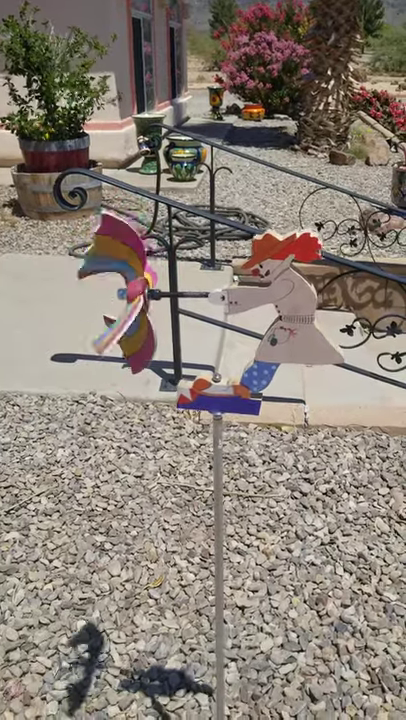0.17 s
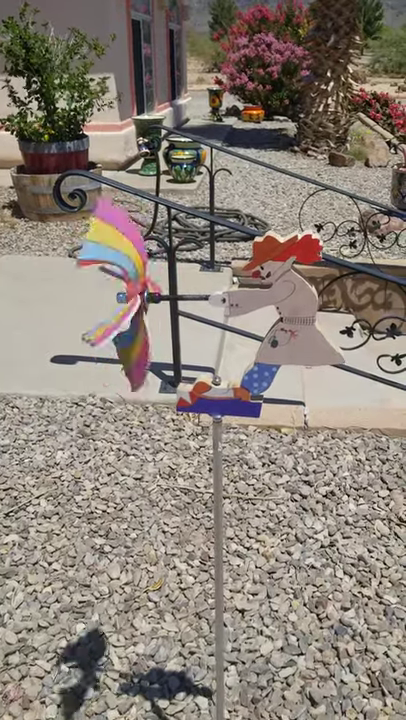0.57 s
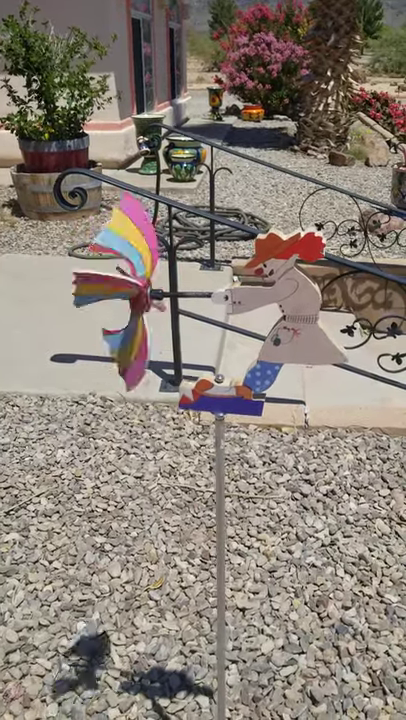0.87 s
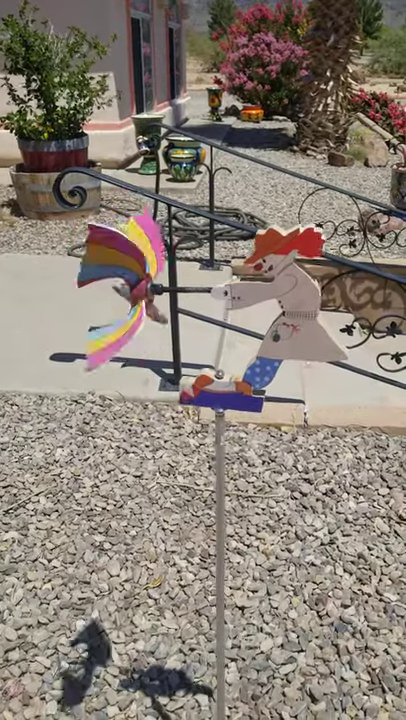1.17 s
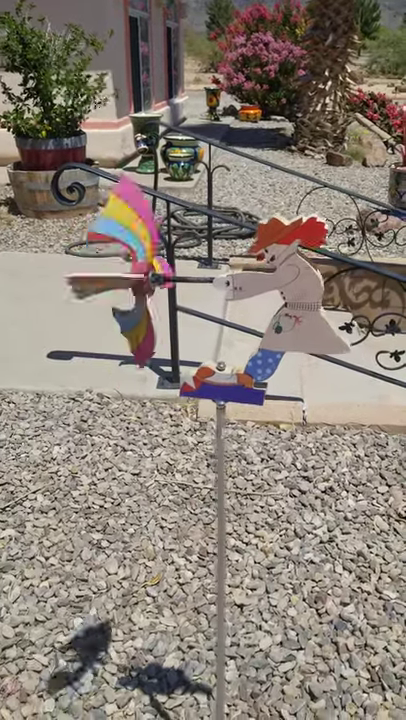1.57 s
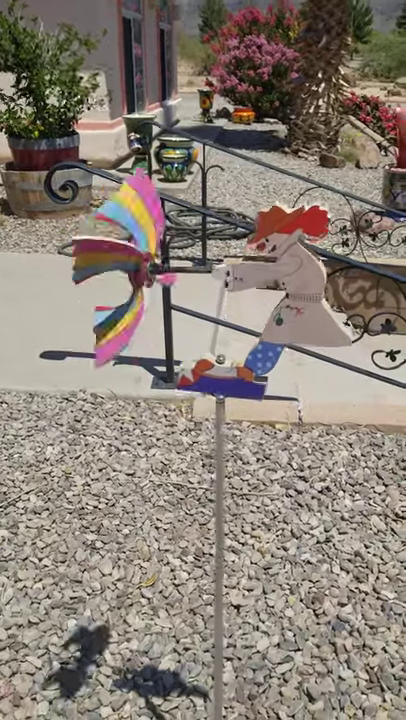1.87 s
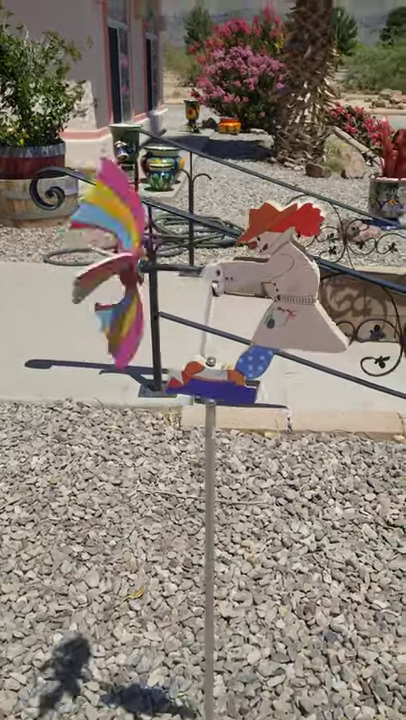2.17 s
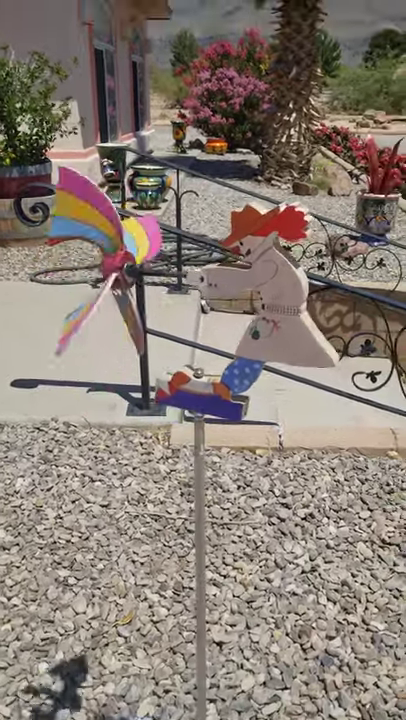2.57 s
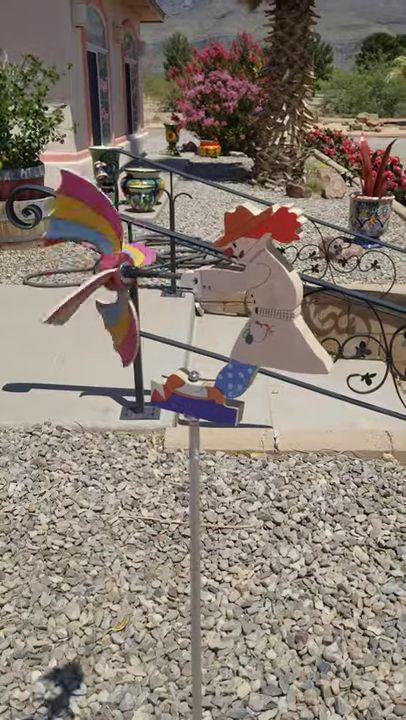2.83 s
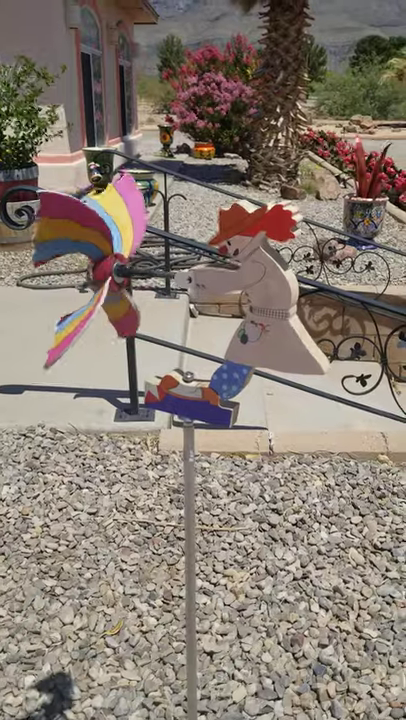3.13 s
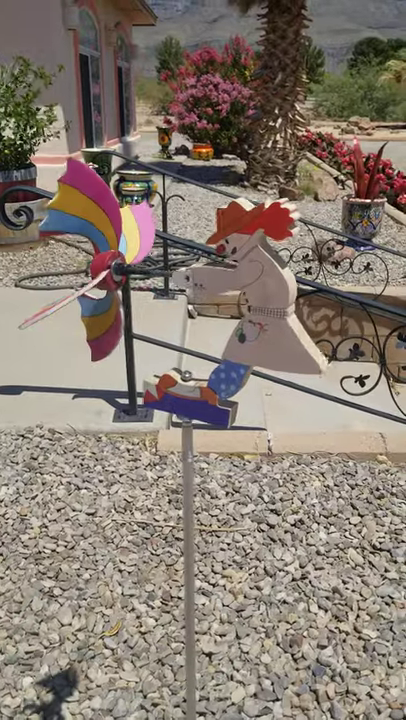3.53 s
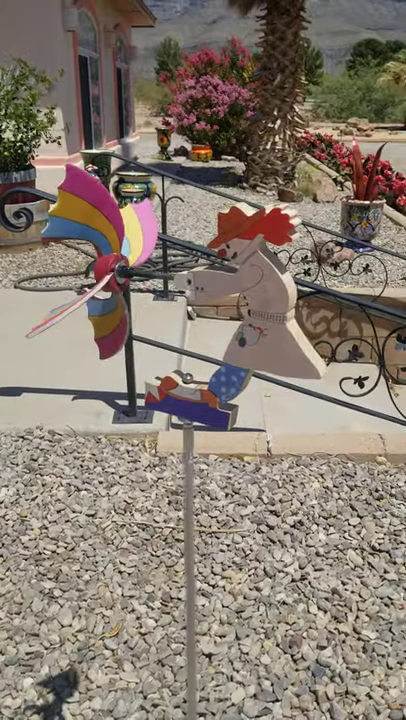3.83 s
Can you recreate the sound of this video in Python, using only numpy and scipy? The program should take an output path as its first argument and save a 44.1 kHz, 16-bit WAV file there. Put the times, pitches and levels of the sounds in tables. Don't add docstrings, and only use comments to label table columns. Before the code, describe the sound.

Gusty wind rumbles and thumps on the microphone while a wooden whirligig clacks, ticks and squeaks

```python
import sys
import numpy as np
from scipy import signal
from scipy.io import wavfile
from scipy.ndimage import uniform_filter1d

SR = 44100
rng = np.random.default_rng(int(sys.argv[2]) if len(sys.argv) > 2 else 0)


def boost_factor(decibels):
    exponent = np.asarray(decibels, float) / 20
    return 10 ** exponent


def persist_wave(psi):
    counts = np.round(np.clip(psi, -1, 1) * 32767).astype(np.int16)
    wavfile.write(sys.argv[1], SR, np.atleast_2d(counts).T)


N = 176400


def evened(x):
    return x / np.sqrt(np.mean(x ** 2) + 1e-20)


def read(points, hz):
    f, value = np.transpose(points)
    return np.interp(np.log(hz + 1), np.log(f + 1), value)


def add(mix, s, sound):
    at = round(s * SR)
    sound = sound[..., max(-at, 0):]
    part = mix[..., max(at, 0):][..., :sound.shape[-1]]
    part += sound[..., :part.shape[-1]]


def steep(x, hz, kind):
    return signal.sosfilt(signal.butter(4, hz, kind, fs=SR, output="sos"), x)


def resonate(x, hz, width):
    turn = np.exp(2j * np.pi * np.cumsum(hz * np.ones(len(x))) / SR)
    r = np.exp(-np.pi * width / SR)
    return 2 * (turn * signal.lfilter([1 - r], [1, -r], x / turn + 1e-18)).real


def ring(modes):
    t, soft_s = np.arange(4000) / SR, .0005
    sines = sum(boost_factor(db - 60 * t / t60) * np.sin(2 * np.pi * hz * t) for hz, db, t60 in modes)
    return (1 - np.exp(-t / soft_s)) * sines


def noise(size, colour, same=0, lead=0):
    frames, hz = N * 4 // size + 5, np.fft.rfftfreq(size, 1 / SR)
    a, b, c, d = rng.standard_normal((frames, len(hz), 4)).T
    left, other = a + 1j * b, c + 1j * d
    same = np.clip(same(hz), 0, 1)[:, None] if same else 0
    turn = np.exp(-1j * read(lead, hz))[:, None] if lead else 1
    z = np.array([left, same * left * turn + np.sqrt(1 - same ** 2) * other])
    z = z * boost_factor(colour(hz[:, None], np.arange(frames) * size / 4 / SR))
    return evened(signal.istft(z, nperseg=size, noverlap=size * 3 // 4)[1][:, :N])


def drift(t, top_hz):
    f = np.geomspace(4, top_hz, num=40)[:, None]
    phase = rng.random((2, 40, 1))
    return evened((np.sin(2 * np.pi * (f * t + phase)) / f ** 0.46).sum(1))


def wind():
    # time in seconds, wind level in dB
    gust = [(0, -33.5), (.1, -32.5), (.35, -36), (.43, -37.5), (.55, -34.5), (.62, -31), (1.03, -30),
            (1.1, -33), (1.55, -36.5), (1.85, -33.5), (2.0, -33), (2.2, -28), (2.33, -30.5), (2.379, -33.5),
            (2.68, -41.5), (2.782, -33.5), (2.87, -46), (4, -41.5)]
    # frequency in Hz, density in dB per Hz
    wind_colour = [(15, -31), (30, 3), (52, 9), (100, 4.5), (190, -11), (350, -5), (730, -27),
                   (1000, -33.5), (1300, -52)]
    wind_db, lump_db, lump_hz = -1, 4, 40
    flick_db, flick_hz, bright = 4, 80, .35
    t = np.arange(N) / SR
    level = np.interp(t, *np.transpose(gust))
    coarse = t[::64]
    lump = np.repeat(drift(coarse, lump_hz), 64, axis=1)[:, :N]
    flick = np.repeat(drift(coarse, flick_hz), 64, axis=1)[:, :N]
    raw = noise(4096, lambda hz, _: read(wind_colour, hz) - 60 * (hz > 1100))
    low = signal.sosfilt(signal.butter(2, 170, fs=SR, output="sos"), raw)
    swing = boost_factor(lump_db * uniform_filter1d(lump, size=128))
    swing = swing / np.sqrt(np.mean(swing ** 2))
    extra_db = flick_db * uniform_filter1d(flick, size=128) + bright * (level + 38.5)
    return boost_factor(level + wind_db) * swing * (low + (raw - low) * boost_factor(extra_db))


def patchy(hz, t):
    grain = rng.standard_normal((len(t), len(hz)))
    grain = uniform_filter1d(grain, size=12, axis=0)
    return evened(uniform_filter1d(grain, size=8, axis=1)).T


def air():
    # frequency in Hz, density in dB per Hz
    roar_colour = [(200, -45), (400, -7), (800, -5), (1100, 0.5), (1300, -6.5), (1700, -12.5), (2300, -25),
                   (2700, -41)]
    # time in seconds, roar level in dB
    swell = [(0, -58), (0.498, -51.5), (1.1, -55.5), (2.0, -48.5), (2.65, -49), (3.1, -55), (4, -51)]
    # frequency in Hz, density in dB per Hz
    hiss_colour = [(880, -34), (1500, -3), (1670, -8), (1880, -3), (3450, -5.5), (5770, -6), (8660, -16),
                   (12700, -11), (16000, -16)]
    # frequency in Hz, left over right in dB
    hiss_pan = [(4000, -1.5), (8000, 11), (15000, 9)]
    # frequency in Hz, share of the hiss common to both ports (0 to 1)
    hiss_same = [(2000, .4), (8000, .1)]
    # frequency in Hz, phase between the ports in radians
    lead = [(1200, 0), (1900, 1.8), (3000, 1.4), (5000, 7.9)]
    roar_same, hiss_db, patch_db = 0.68, -57.5, 1.8
    sides = np.array([.5, -.5])[:, None, None]

    def roar_db(hz, t):
        return read(roar_colour, hz) - 60 * (hz > 2700) + patch_db * patchy(hz, t)

    def hiss_spectrum_db(hz, t):
        tilt = sides * read(hiss_pan, hz)
        return read(hiss_colour, hz) - 40 * (hz < 1500) + tilt + patch_db * patchy(hz, t)

    roar = noise(1024, roar_db, lambda hz: roar_same * np.where(hz < 1500, 1, .5), lead)
    hiss = noise(512, hiss_spectrum_db, lambda hz: read(hiss_same, hz), lead)
    level = np.interp(np.arange(N) / SR, *np.transpose(swell))
    return boost_factor(level) * roar + boost_factor(hiss_db) * hiss


def whistle(hz, db, fade_db):
    width_hz, warble_hz, warble = 550, 48, .07
    u = np.linspace(0, 1, len(hz))
    beat = np.sin(2 * np.pi * warble_hz * np.arange(len(hz)) / SR)
    hz = hz * (1 + warble * beat)
    husk = rng.standard_normal(len(hz))
    for _ in range(2):
        husk = resonate(husk, hz, width_hz)
    tone = np.sqrt(2) * np.sin(2 * np.pi * np.cumsum(hz) / SR) + 1.1 * evened(husk)
    ends = np.clip(u / .12, 0, 1) * np.clip((1 - u) / .1, 0, 1)
    return boost_factor(db + fade_db * u + 5 * beat) * ends * tone


def squeaks():
    # start in seconds, length in seconds, level in dB
    falling = [
        (-.036, .115, -51),
        (1.5, .115, -48.5),
        (2.957, .112, -48.5),
    ]
    # share of its length (0 to 1), frequency in Hz
    glide = [(0, 4300), (.1, 5100), (.3, 4750), (.42, 3900), (.6, 3500), (1, 3050)]
    # start in seconds, length in seconds, level in dB, first and last frequency in Hz
    peeps = [
        (2.09, .075, -66, 3150, 3550),
        (2.412, .02, -63, 3600, 3500),
    ]
    out = np.zeros(N)
    for s, length, db in falling:
        u = np.arange(0, 1, 1 / SR / length)
        add(out, s, whistle(np.interp(u, *np.transpose(glide)), db, -13))
    for s, length, db, from_hz, to_hz in peeps:
        add(out, s, whistle(np.linspace(from_hz, to_hz, round(length * SR)), db, 0))
    return out


def knocks():
    # start in seconds, peak in dB, peg over board in dB, rattle in seconds, rise in seconds
    blows = [(.03, -39, -19, 0.028, 0.0041), (.374, -35.5, -10, 0.0085, 0.02),
             (.806, -36.5, -22, 0.013, 0.0025), (.8705, -45.5, 6, 0.0044, 0.00046),
             (.884, -43, 4, 0.0056, 0.0016), (.899, -47, 0.5, 0.014, 0.0025),
             (1.1705, -24.5, -15.5, 0.0034, 0.00018), (1.182, -29, -14, 0.013, 0.0008),
             (1.25, -45, -5.5, 0.0088, .002), (1.401, -31, -21, 0.0095, 0.0027),
             (1.417, -39, -7, 0.012, 0.0037), (1.59, -40, -14, 0.0032, 0.00083),
             (1.62, -40.5, -14, 0.0047, .001), (1.7065, -44.5, 11, 0.0081, 0.001),
             (1.718, -47, 6, 0.007, 0.0018), (1.732, -50.5, 7.5, 0.016, 0.0025),
             (1.862, -58, -7, .005, .001), (1.899, -47, -2, 0.0064, .0005), (2.446, -37, -13, 0.044, .03),
             (2.49, -40.5, -10, 0.028, 0.021), (2.772, -37.5, -17, 0.017, 0.0066),
             (3.42, -53, 6, 0.0089, 0.00079), (3.65, -37, -7, 0.05, 0.0057), (3.9, -56, -17, 0.0067, .003)]
    # frequency in Hz, level in dB, 60 dB decay in seconds
    wood = [(450, -3, .015), (720, -1, .016), (1000, 0, .02), (1250, -1, .018), (1550, -5, .02),
            (1720, -9, .02)]
    # frequency in Hz, level in dB, 60 dB decay in seconds
    peg = [(2700, 0, .02), (3050, 2, .012), (3400, 0, .01), (3900, -3, .008), (4600, -2, .008),
           (5100, -1, .009), (6300, -8, .006), (7800, -9, .006)]
    rattle_per_s, knock_db = 700, 2

    def struck(taps, modes):
        modes = np.array(modes, float)
        modes[:, 0] *= rng.uniform(.95, 1.05, len(modes))
        sound = signal.fftconvolve(taps, ring(modes))
        return sound / abs(sound).max()

    out, t = np.zeros(N), np.arange(0, .09, 1 / SR)
    for s, db, bright_db, length, rise in blows:
        shape = np.exp(-(np.maximum(t - rise, 0) / length) ** 2) * np.minimum(t / abs(rise), 1)
        hits = (rng.random(len(t)) < rattle_per_s / SR) + 0.045
        taps = rng.standard_normal(len(t)) * hits * shape
        taps[0] = np.exp(-abs(rise) / .002)
        add(out, s, boost_factor(db + knock_db) * (struck(taps, wood) + boost_factor(bright_db) * struck(taps, peg)))
    return out


def puffs():
    # start in seconds, peak in dB, rush in dB, left over right in dB
    main = [(0.032, -14, -22, 0), (0.181, -24, -19, 21.5), (0.209, -15.5, -21, 3.5),
            (0.31, -17.5, -17, -5.5), (0.6, -19.5, -23, 1), (0.628, -20, -18, 11),
            (0.732, -32.5, -30, -19), (0.757, -25.5, 4.5, 5), (0.806, -14.5, -9.5, 0.5),
            (0.914, -12, -11.5, 2.5), (0.964, -23.5, -7, 15), (0.999, -15, -44, 4.5),
            (1.269, -18.5, -16, 2), (1.372, -20, -39, 2), (1.573, -24, -3.5, 0), (1.69, -22, -10, 8),
            (1.785, -23.5, 3, 1), (1.828, -15.5, -16, 1), (2.073, -13.5, -21.5, 0), (2.118, -12, -22, 1),
            (2.159, -28, -2, -9), (2.238, -16, -15, 11.5), (2.288, -16.5, -7.5, 2),
            (2.451, -18, -18.5, -5), (3.517, -45, 7, 21.5),
            (2.986, -25.5, -26, -2),
        (3.291, -38.5, -2, 4),
    ]
    # start in seconds, peak in dB, rush in dB, left over right
    # in dB
    extra = [(0.074, -19, -13.5, 4.5), (0.346, -23, -29, 4), (0.374, -21.5, -13.5, 0.5),
             (0.48, -24, -23, -9), (0.678, -19, -29, 0), (0.854, -19, -10.5, 3), (0.937, -16.5, -8.5, -3),
             (1.02, -20.5, -10.5, 11), (1.124, -16.5, -28, -1), (1.493, -20.5, -28, -5),
             (1.638, -25.5, -29, -6), (1.86, -28, -28, -3.5), (1.884, -19, -24, -11), (2.102, -26, -13, 13),
             (2.211, -18.5, -7.5, 0), (2.314, -13.5, -17.5, 2), (2.72, -38, -23, 4.0),
             (2.809, -34.5, -18, 10), (3.492, -37, -2, 9), (3.573, -35.5, -18, -19), (3.679, -33.5, -2, 2),
             (3.845, -45.5, -3, -12)]
    puff_db, puff_s, thump_db = -3.5, 0.0057, -6.5
    out, t = np.zeros((2, N)), np.arange(3000) / SR
    shape = t / puff_s * np.exp(1 - t / puff_s)
    sides = np.array([[.5], [-.5]])

    def burst(band_hz):
        raw = steep(rng.standard_normal((2, 6000)), band_hz, "band")[:, 3000:]
        power = np.mean((shape * raw) ** 2, 1) / np.mean(shape ** 2)
        return raw / np.sqrt(power)[:, None]

    for s, db, rush_db, pan in [*main, *extra]:
        body = boost_factor(thump_db) * burst([45, 220]) + boost_factor(rush_db) * burst([240, 600])
        add(out, s, boost_factor(db + puff_db + sides * pan) * shape * body)
    return out


def ticks():
    # start in seconds, peak in dB, snap in dB
    catches = [(0.2774, -73, -2), (0.4946, -51.5, -14.5), (.5842, -67, -11), (0.8984, -59, -18),
               (1.0126, -63, -19), (1.098, -65, -22), (1.119, -71, -8), (1.1608, -60, -15),
               (1.5131, -59, -19), (1.5789, -71, -8), (1.6167, -60.5, -15), (1.7065, -61, -13),
               (1.72, -62, -8), (1.7979, -72, -5), (1.9001, -66, -20), (1.922, -64, -3),
               (1.926, -60, -10.5), (1.968, -62, -8), (1.9743, -52.5, -31), (2.815, -58, -11),
               (2.833, -66, -9), (2.864, -67, -6), (2.9085, -59.5, -6.5), (2.9134, -62.5, -7)]
    # frequency in Hz, level in dB, 60 dB decay in seconds
    pivot = [(4960, 0, .018), (2950, -15, .012), (6900, -9, .01)]
    tick_db, snap_db, snap_t60 = 18, 11, .02
    small_per_s, small_db = 16, -55.5
    out, ping = np.zeros(N), ring(pivot)
    ping = ping / abs(ping).max()
    t = np.arange(len(ping)) / SR
    for s, db, top_db in catches:
        snap = steep(rng.standard_normal(len(t)) * boost_factor(-60 * t / snap_t60), [4500, 13000], "band")
        add(out, s, boost_factor(db + tick_db) * (ping + boost_factor(top_db + snap_db) * snap))
    extra = (rng.random(N) < small_per_s / SR) * boost_factor(small_db + rng.standard_normal(N))
    return out + signal.oaconvolve(extra, ping)[:N]


def yard(x):
    yard_t60, yard_db, lag, shade_hz = .18, -13, 3, 5500
    t = np.arange(SR // 2) / SR
    echoes = rng.standard_normal((2, len(t))) * (rng.random((2, len(t))) < .05)
    tail = echoes * boost_factor(-60 * t / yard_t60) * (t > .004)
    wet = signal.fftconvolve(x[None], tail / np.linalg.norm(tail[0]), axes=1)[:, :N]
    right = signal.lfilter(*signal.butter(1, shade_hz, fs=SR), np.roll(x, lag - 1))
    return np.array([x, right]) + boost_factor(yard_db) * wet


def scene():
    spinner = squeaks() + knocks() + ticks()
    return wind() + air() + puffs() + yard(spinner)


def roll_off(x):
    return signal.sosfilt(signal.butter(12, 16440, fs=SR, output="sos"), x)


def record(dry):
    # port (0 left, 1 right), start in seconds, end in seconds
    lee = [(0, .41, .44), (0, 2.66, 2.7), (0, 2.85, 2.95), (0, 3.03, 3.28), (0, 3.32, 3.49), (0, 3.6, 3.84),
           (0, 3.88, 3.95), (1, .13, .19)]
    low_cut_hz, edge_hz = 30, 15720
    dip_hz, dip_q, dip_share = 2300, 4, .55
    lee_hz, lee_db = 260, -30
    t, shut = np.arange(N) / SR, np.zeros((2, N))
    dry = signal.sosfilt(signal.butter(2, low_cut_hz, "high", fs=SR, output="sos"), dry)
    dry = dry - dip_share * signal.lfilter(*signal.iirpeak(dip_hz, dip_q, SR), dry)
    for port, start, end in lee:
        shut[int(port)] += (t > start) & (t < end)
    low = signal.oaconvolve(dry, signal.firwin(2047, lee_hz, fs=SR)[None], "same")
    calm = dry - (1 - boost_factor(lee_db)) * uniform_filter1d(shut, size=600) * low
    edge = signal.firwin(1023, edge_hz, window=("kaiser", 9), fs=SR)
    return roll_off(signal.oaconvolve(calm, edge[None], "same"))


dry = scene()
out = record(dry)
persist_wave(out)
```